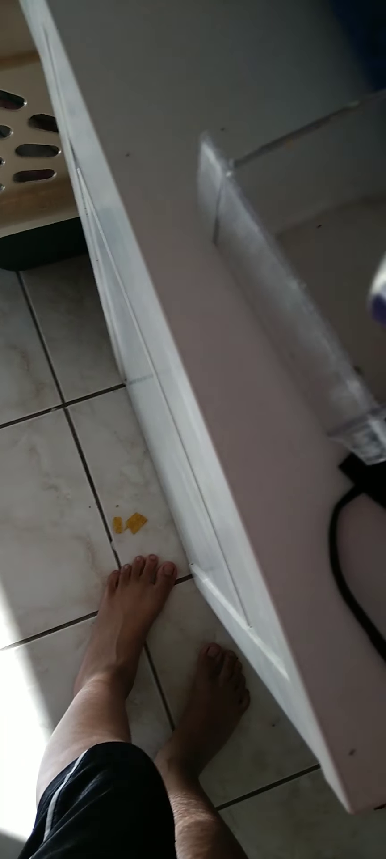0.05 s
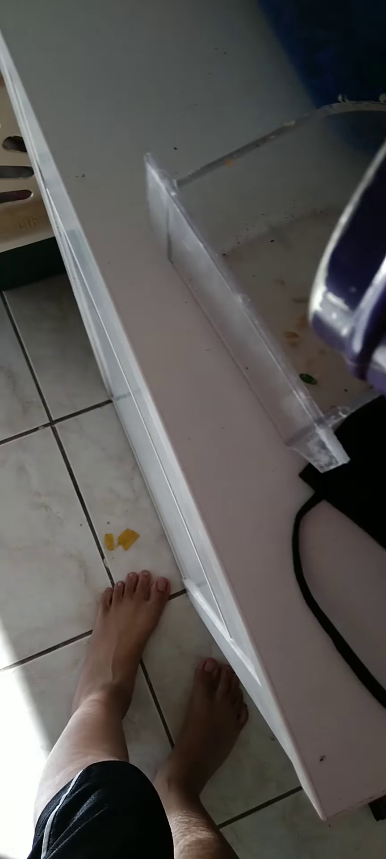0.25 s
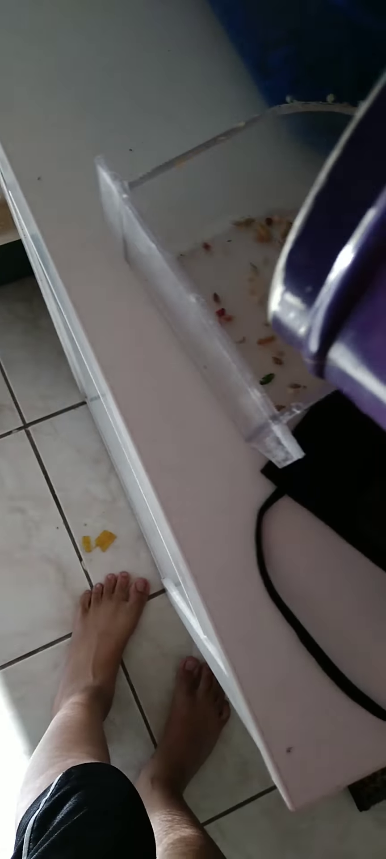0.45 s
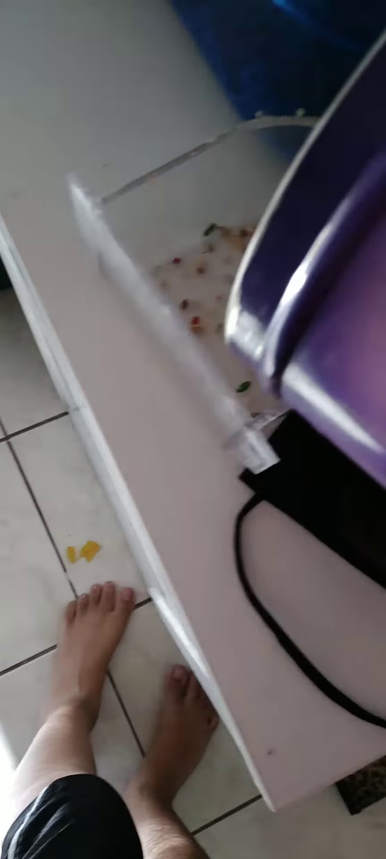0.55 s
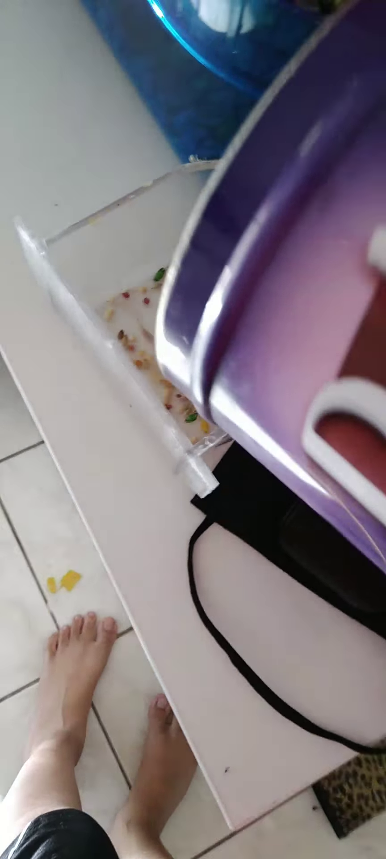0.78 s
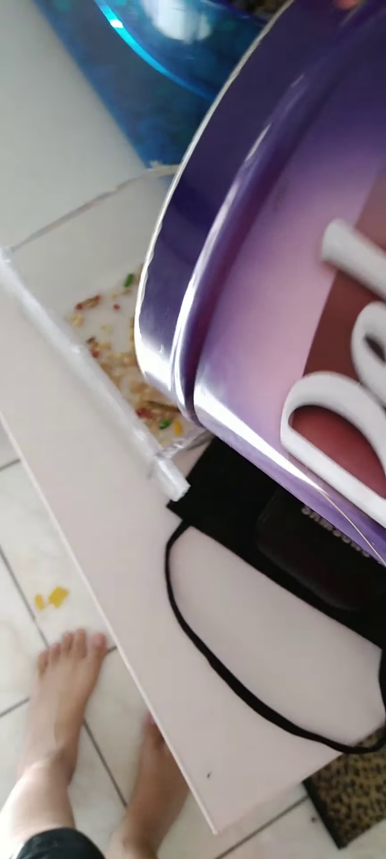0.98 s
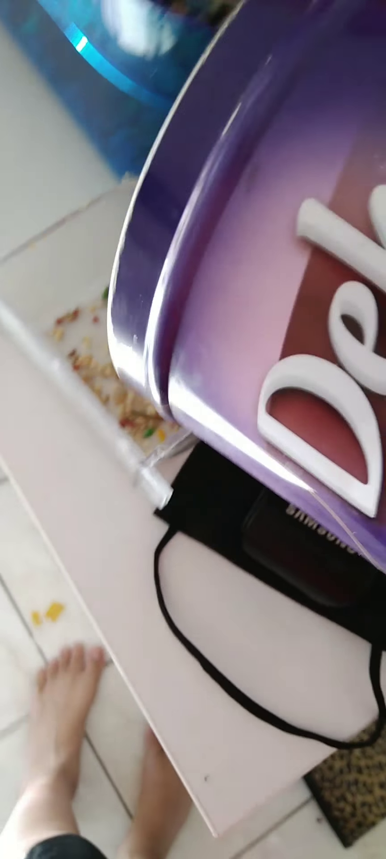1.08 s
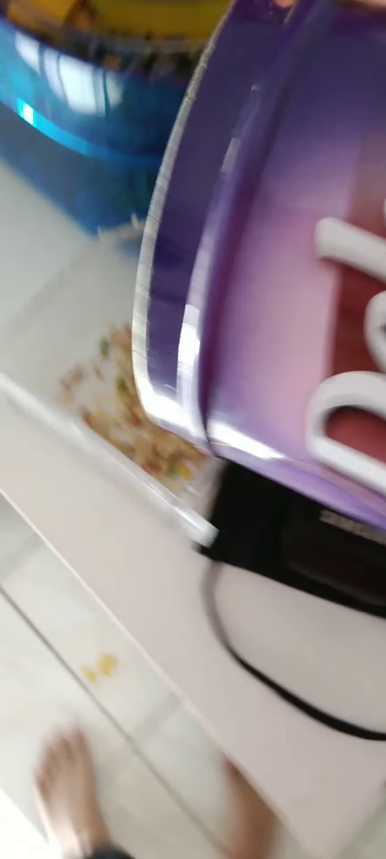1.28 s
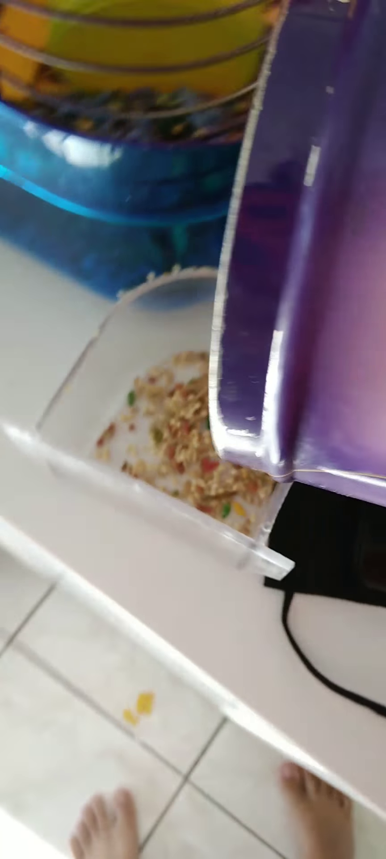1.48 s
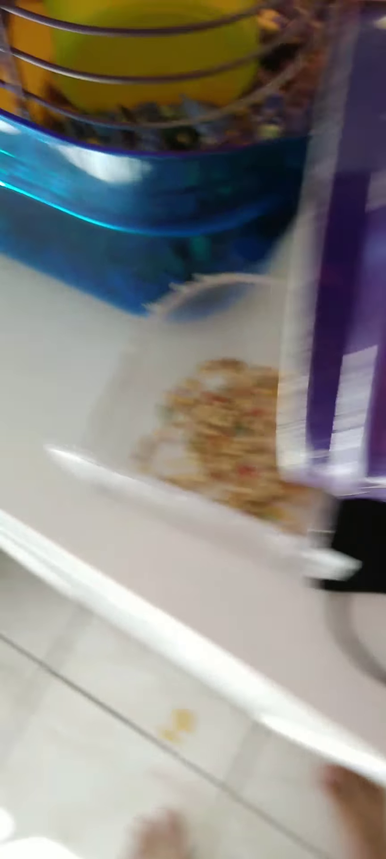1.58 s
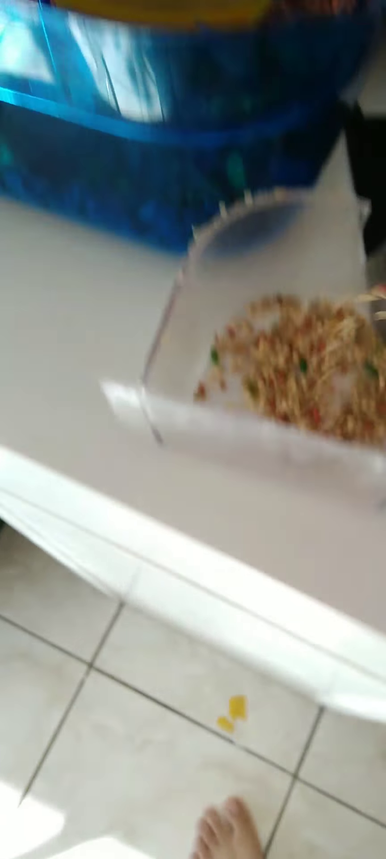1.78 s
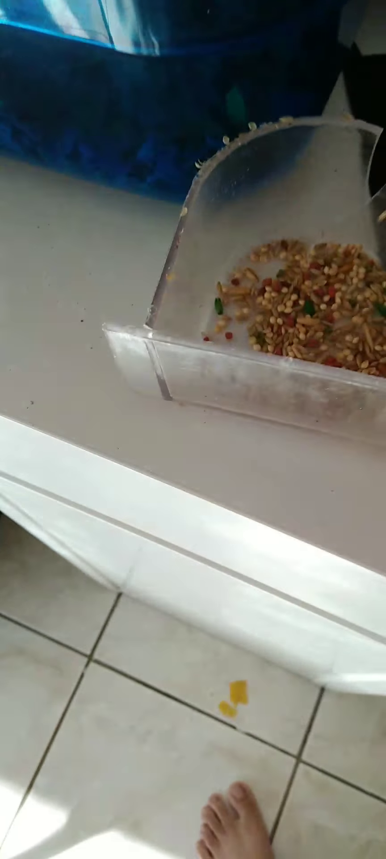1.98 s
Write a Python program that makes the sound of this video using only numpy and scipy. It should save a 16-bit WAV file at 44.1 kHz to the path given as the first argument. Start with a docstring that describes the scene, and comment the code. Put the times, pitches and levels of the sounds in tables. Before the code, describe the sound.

Dry bird seed patters from a tin into a hard plastic tray, close by in a small tiled room. The tray takes a few hollow knocks midway, then the pour stops and leftover seed slides back inside the tin.

```python
"""Dry bird seed slides out of a tin and patters into a hard plastic tray, close to a phone in a small
tiled room, over a low rumble and a hand shifting on the phone. Big seeds tick above the stream, and
midway the tray is bumped a few times, each bump a knock, a thump and a hollow ring. The pour thins out
and stops, the last seed scraping over the lip; the tin is tipped upright and the seed left in it
slides back."""
import sys
import numpy as np
from scipy import signal
from scipy.fft import rfft, irfft
from scipy.io import wavfile

SR = 44100
rng = np.random.default_rng(int(sys.argv[2]) if len(sys.argv) > 2 else 0)


def generate_wav(sig):
    """Save sig (samples, or channels by samples) to the path in sys.argv[1] as 16-bit PCM at SR."""
    pcm = np.round(np.clip(np.atleast_2d(sig).T, -1, 1) * 32767).astype(np.int16)
    wavfile.write(sys.argv[1], SR, pcm)


N = 90404
TIME = np.arange(N) / SR
SEED_UNLIKE, BUMP_UNLIKE = 1, 0.35  # share of a sound that differs between left and right, 0 to 1


def undb(db):
    """Decibels to gain."""
    return 10 ** (np.asarray(db) / 20)


def curve(rows):
    """An automation line through (seconds, value) rows."""
    return np.interp(TIME, *np.array(rows).T)


def unit(x):
    """Scale to rms 1."""
    return x / np.sqrt(np.mean(x ** 2))


def pan(db):
    """Channel gains for a left-minus-right balance in dB."""
    return undb(np.array([[.5], [-.5]]) * db)


def add(out, start_s, x):
    """Mix a sound in at a time."""
    i = int(start_s * SR)
    out[:, i:i + x.shape[-1]] += x[..., :N - i]


def convolve(x, impulse):
    """Play a sound through an impulse response."""
    return signal.fftconvolve(np.atleast_2d(x), np.atleast_2d(impulse), axes=1)[:, :N]


def gains(points, hz):
    """Read (Hz, dB) points as gains along a log-frequency axis."""
    at_hz, db = np.array(points).T
    return undb(np.interp(np.log(hz + 1), np.log(at_hz), db))


def colour(x, points, size=4096):
    """Minimum-phase EQ through (Hz, relative dB) points; white noise keeps its level."""
    gain = unit(gains(points, np.fft.rfftfreq(size, 1 / SR)))
    cepstrum = irfft(np.log(gain))
    cepstrum[1:size // 2] *= 2
    cepstrum[size // 2 + 1:] = 0
    return convolve(x, irfft(np.exp(rfft(cepstrum))))


def fade(t60):
    """Exponential decay from 1 down to -60 dB."""
    return np.exp(-np.log(1000) * TIME[:int(t60 * SR)] / t60)


def mode(hz, t60):
    """One dying sine of random polarity."""
    decay = fade(t60)
    return decay * np.sin(2 * np.pi * hz * TIME[:len(decay)]) * rng.choice([-1, 1])


def burst(t60, unlike, size=32768):
    """Decaying stereo noise: countless modes dying together."""
    noise = rng.standard_normal((3, size))
    decay = fade(t60)[:size]
    stereo = np.sqrt(1 - unlike) * noise[0] + np.sqrt(unlike) * noise[1:]
    x = stereo[:, :len(decay)] * decay
    return x * np.linalg.norm(decay) / np.linalg.norm(x, axis=1, keepdims=True)


def response(t60, unlike=SEED_UNLIKE):
    """A burst of unit energy per side, for use as a resonance or reverb."""
    x = burst(t60, unlike)
    return x / np.linalg.norm(x[0])


# Fader rides for the room rumble and the hand. Each row: time in seconds, level in dB.
RUMBLE_FADER = [(0, -51.5), (.75, -50), (.95, -57.5), (1.5, -57.5), (2.05, -56.5)]
HAND_FADER = [(.28, -80), (.33, -45), (.45, -47.5), (.55, -49), (.66, -43.5), (.85, -71), (1, -74.5)]
# Their tone. Each row: frequency in Hz, relative level in dB.
RUMBLE_EQ = [(12, 3.5), (28, 7.5), (60, -7), (100, -11.5), (200, -18.5), (380, -16), (600, -30),
             (1500, -42.5), (5000, -67.5), (16000, -63)]
HAND_EQ = [(10, -20.5), (27, 2.5), (45, -23), (65, -22), (120, -29), (400, -45.5)]


def rumble():
    """The bed: low room noise and the hand shifting on the phone, nearly mono."""
    out = 0
    for fader, eq in ((RUMBLE_FADER, RUMBLE_EQ), (HAND_FADER, HAND_EQ)):
        noise = rng.standard_normal(N) + .5 * rng.standard_normal((2, N))
        out = out + unit(colour(noise, eq)) * undb(curve(fader))
    return out


def room(x, wet_db, t60, unlike, predelay_s=.008):
    """Add the wash that comes back off the tiles."""
    tail = np.pad(response(t60, unlike), ((0, 0), (int(predelay_s * SR), 0)))
    return x + undb(wet_db) * convolve(x, tail)


def twin_modes(hz, t60, detune=0.0183, twin_db=-8):
    """A mode and its weaker twin, which beats against it differently at each blow and on each side."""
    twins = np.array([mode(hz * (1 + detune * rng.uniform(-0.97, 1)), t60) for _ in range(2)])
    return mode(hz, t60) + undb(twin_db) * twins


# Bumps of the tray. Each row: start in seconds, ring, knock and thump levels in dB,
# centre of the ring in Hz, pitch of the knock in Hz.
BUMP_CUES = [(.573, -37, -26, -54.5, 580, 1990), (.61, -43, -34.5, -71, 505, 1110),
             (.683, -39.5, -61, -55, 308, 349), (0.7252, -39.5, -19, -35.5, 1230, 1430),
             (0.7623, -27, -18, -43.5, 440, 516), (.913, -49.5, -43.5, -73, 443, 437)]
# The tray's hollow ring. Each row: pitch in Hz, relative level in dB, time to fall 60 dB in seconds.
HOLLOW_MODES = [(158.6, -9.5, 0.81), (225.6, -11.5, 0.42), (276.5, -7.5, 0.39), (317.3, -1.5, 0.3),
                (383.4, -2, 0.38), (458.6, 1.5, 0.27), (470.3, -4.5, 0.64), (541.8, 4.5, 0.2),
                (568, -7.5, 0.28), (619, -13, 0.31), (780, -4, 0.38), (846, -1.5, 0.34), (1009, 5, 0.73),
                (1053, 10, 0.31), (1119, 10.5, 0.33), (1383, 1, .25), (1656, 1.5, 0.55)]
# Tone of the knock and of the thump. Each row: frequency in Hz, relative level in dB.
KNOCK_EQ = [(100, -19), (300, -3), (520, 5), (700, -6), (1120, 1.5), (1600, -14), (2100, -18.5),
            (3200, -12.5), (6000, -44)]
THUMP_EQ = [(30, 2), (130, 2.5), (250, 6), (600, -20), (2000, -109)]


def bumps(rolloff_db_per_octave=11.5):
    """A hard knock, a thump through the counter and a hollow ring; where a bump lands sets the pitch."""
    ring, knock, thump = np.zeros((3, 2, N))
    for start, ring_db, knock_db, thump_db, centre_hz, knock_hz in BUMP_CUES:
        for hz, db, t60 in HOLLOW_MODES:
            rolloff_db = rolloff_db_per_octave * abs(np.log2(hz / centre_hz))
            add(ring, start, undb(ring_db + db - rolloff_db) * twin_modes(hz, t60))
        focus = [(knock_hz / 2, -8), (knock_hz, 0), (knock_hz * 2, -4)]
        add(knock, start, undb(knock_db) * colour(burst(t60=0.039, unlike=BUMP_UNLIKE), focus))
        add(thump, start, undb(thump_db) * burst(t60=0.085, unlike=BUMP_UNLIKE))
    blows = colour(knock, KNOCK_EQ) + colour(thump, THUMP_EQ)
    return ring + room(blows, wet_db=-4, t60=0.77, unlike=BUMP_UNLIKE)


# Fader ride for the scrape. Each row: time in seconds, level in dB.
LIP_FADER = [(1.225, -100), (1.238, -42.5), (1.262, -42), (1.276, -60), (1.292, -45), (1.33, -57),
             (1.37, -100)]
# The narrow band it rings. Each row: frequency in Hz, relative level in dB.
LIP_EQ = [(5500, -28), (6900, -5.5), (7400, 4.5), (7900, -10), (9000, -30)]


def lip_scrape():
    """A short, thin scrape as the last seed goes over the lip of the tin."""
    return unit(colour(rng.standard_normal((2, N)), LIP_EQ)) * undb(curve(LIP_FADER))


def spot_eq(spread_db):
    """Random (Hz, dB) points: every landing spot has its own tone."""
    return np.column_stack([np.geomspace(2000, 16000, num=12), spread_db * rng.standard_normal(12)])


def pings(flow, per_s=800, low_hz=2933, high_hz=15930, trim_db=-6, max_pings=2048):
    """Sparkle: hard little seeds, each ringing at its own pitch and place in the stereo field."""
    out = np.zeros((2, N))
    decay = fade(t60=0.014)
    for when, pitch, strength, side, lag in rng.random((max_pings, 5))[:int(per_s * N / SR)]:
        hz = low_hz + pitch * (high_hz - low_hz)
        phases = np.array([[0], [np.pi * (2 * lag - 1)]])
        note = decay * np.sin(2 * np.pi * hz * TIME[:len(decay)] + phases)
        add(out, when * N / SR, strength * np.sqrt([[side], [1 - side]]) * note)
    return unit(out) * undb(curve(flow) + trim_db)


# Where the stream lands. Each row: time in seconds, left minus right in dB.
STREAM_PAN = [(0, -5), (.4, -1.5), (.75, -3), (1.18, -2), (1.25, -7.5), (1.32, -3.5), (1.4, -0.5),
              (1.85, -4)]
SEEDS_PER_S, SEED_SPREAD_DB, PATTER_DB = 1100, 2.5, -0.5
CLUMPS_PER_S, CLUMP_DB = 70, 1.3


def stream(flow, spots=8):
    """Small seeds of uneven size land in little surges on several spots, each with a brief ring."""
    patter = 0
    for _ in range(spots):
        lands = rng.random(N) < SEEDS_PER_S / spots / SR
        sizes = undb(SEED_SPREAD_DB * np.clip(rng.standard_normal(N), -1.6, 1.6))
        impacts = unit(lands * sizes) * undb(curve(flow))
        spot_ring = colour(response(t60=0.012), spot_eq(spread_db=5))
        patter = patter + convolve(impacts, spot_ring)
    clumps = undb(CLUMP_DB * np.interp(TIME * CLUMPS_PER_S, np.arange(N), rng.standard_normal(N)))
    grains = undb(PATTER_DB) * patter / np.sqrt(spots) + pings(flow)
    return grains * clumps * pan(curve(STREAM_PAN))


def ticks(cues, rise_s):
    """Big seeds strike one at a time, each a sharp click with its own brightness."""
    out = np.zeros((2, N))
    for start, db, pan_db, treble_db in cues:
        click = burst(t60=0.028, unlike=SEED_UNLIKE, size=4096)
        attack = 1 - np.exp(-TIME[:click.shape[1]] / rise_s)
        tilt = [(1200, -8.5), (3000, 0.0057), (9000, treble_db / 2), (14000, treble_db)]
        click = colour(click * attack, tilt)
        add(out, start, undb(db) * pan(pan_db) * colour(click, spot_eq(spread_db=3)))
    return out


def vessel(flow, tick_cues, eq, modes, rise_s):
    """Small and big seeds strike a thin wall, which rings on briefly and sings a few high notes."""
    small, big = stream(flow), ticks(tick_cues, rise_s)
    ring = convolve(undb(-3) * small + undb(-10) * big, response(t60=0.1))
    wall = colour(small + big + ring, eq)
    notes = np.zeros((2, N))
    for hz, db, t60 in modes:
        note = mode(hz, t60)
        add(notes, 0, undb(db) * note / np.linalg.norm(note))
    return wall + convolve(wall, notes)


# Seed sliding inside the tin. Each row: time in seconds, level in dB.
TIN_FLOW = [(1.22, -101), (1.248, -44.5), (1.275, -53), (1.31, -57.5), (1.35, -57.5), (1.5, -65),
            (1.53, -94), (1.678, -106.5), (1.684, -47.5), (1.702, -59.5), (1.714, -46), (1.735, -59.5),
            (1.8, -51.5), (1.855, -44), (1.9, -52), (1.96, -59.5), (2.05, -62)]
# Big seeds on the tin. Each row: start in seconds, level in dB, left minus right in dB, treble in dB.
TIN_TICK_CUES = [(1.236, -30, 10, 23), (1.242, -28, 3, 14), (1.2611, -25.5, 3, 17), (1.283, -32, 18, 16),
                 (1.295, -30.5, 5, 10), (1.32, -28, 9, 16), (1.39, -29, -4, 12.5), (1.4284, -29, 0, 7),
                 (1.682, -40.5, 0, 5.5), (1.7465, -30.5, -3, 3.5), (1.774, -25, -5, 7),
                 (1.831, -25.5, -7, 5.5), (1.9142, -34.5, -3, -7), (1.967, -43, -3, 4),
                 (1.992, -31.5, -0.5, 7.5)]
# Tone of the tin. Each row: frequency in Hz, relative level in dB.
TIN_EQ = [(200, -3), (850, -22), (1050, -5), (1300, -5), (1650, -6), (2400, -2), (2850, 5), (3300, -0.5),
          (5000, 2.5), (6100, 4.5), (6900, 0), (7450, 5), (8600, 2), (9600, 0), (11500, -12.5),
          (15700, -23.5)]
# Its thin high notes. Each row: pitch in Hz, level in dB, time to fall 60 dB in seconds.
TIN_NOTES = [(2870, -21, 0.022), (9650, -21.5, 0.013)]


def slide_in_tin():
    """Seed slides back down the tin; glancing hits soften the attack of the ticks."""
    return vessel(TIN_FLOW, TIN_TICK_CUES, TIN_EQ, TIN_NOTES, rise_s=0.00064)


# Seed falling into the tray. Each row: time in seconds, level in dB.
TRAY_FLOW = [(0, -48.5), (.045, -57), (.065, -59), (.11, -51.5), (.202, -51.5), (.21, -40), (.25, -42),
             (.33, -38.5), (.41, -40.5), (.45, -48.5), (.495, -38.5), (.54, -43.5), (.625, -48), (.64, -34),
             (.69, -40), (.81, -36.5), (.86, -40), (.95, -39), (1.07, -49.5), (1.225, -51.5), (1.25, -52.5),
             (1.34, -60.5), (1.42, -66.5), (1.51, -67), (1.535, -95), (1.58, -67), (1.63, -105)]
# Big seeds on the tray. Each row: start in seconds, level in dB, left minus right in dB, treble in dB.
TRAY_TICK_CUES = [(0.2165, -21, 4, 11), (0.2212, -17.5, 1, 12.5), (0.2613, -20, -3, 11.5),
                  (0.3046, -27, -7, 21), (0.327, -23, 2.5, 6.5), (0.406, -26, -7, 23.5),
                  (0.4413, -33, -3, 4), (0.4623, -14, 1, 6.5), (0.5119, -26.5, -2.5, 14),
                  (.632, -21.5, -3.5, 19), (0.6546, -23, 0.5, 4), (0.7263, -30.5, -11.5, -4),
                  (0.7523, -28.5, -9, 10), (0.768, -17.5, -4, 13), (0.805, -25.5, 1.5, 4.5),
                  (0.8747, -23.5, -4.5, 11.5), (0.9284, -21, -0.5, 9.5), (1.0454, -38, 6, 7.5),
                  (1.095, -41, 9, 5), (1.1072, -30, 1.5, 3.5), (1.1787, -28, -4, 13.5)]
# Tone of seed on plastic. Each row: frequency in Hz, relative level in dB.
TRAY_EQ = [(200, -29.5), (900, -22), (1060, -4), (1180, -3.5), (1420, -5.5), (1650, -11), (2050, 0.5),
           (2350, -4.5), (2800, -1.5), (4000, -5), (5600, 2), (7000, -2), (7900, 1.5), (9000, -2),
           (10200, -5.5), (11200, -14), (12800, -19), (15700, -21.5)]
# The tray wall's thin high notes. Each row: pitch in Hz, level in dB, time to fall 60 dB in seconds.
TRAY_NOTES = [(2050, -22.5, 0.099), (2425, -23, 0.13), (3333, -27, 0.044), (4782, -23.5, 0.18),
              (5490, -26, 0.023), (6232, -23.5, 0.04)]


def pour_into_tray():
    """The lead: seed hits the hard plastic head on, so the ticks are crisp."""
    return vessel(TRAY_FLOW, TRAY_TICK_CUES, TRAY_EQ, TRAY_NOTES, rise_s=0.00039)


# Tone of each side. Each row: frequency in Hz, gain in dB.
LEFT_EQ = [(100, -1.5), (400, 0.5), (1300, 2), (1900, 5), (3000, 3.5), (5500, 1), (7200, 5), (8100, 0),
           (8800, -2), (10000, -15), (11500, -5.5), (14000, 0)]
RIGHT_EQ = [(100, 2), (400, -1), (1300, -1), (1900, -3.5), (3000, 1.5), (5500, -2), (7200, -6), (8100, -7),
            (8800, -3.5), (10000, 8), (11500, 3.5), (14000, 0.5)]
# Stereo width. Each row: frequency in Hz, side relative to mid in dB.
STEREO_WIDTH = [(1200, -0.5), (4500, 0.5), (7500, -3), (10000, -3.5), (13000, -2.5)]


def stereo_image(x, right_lag_s=0.000419):
    """The left side leads slightly; the treble sits nearer the centre, and each side has its own tone."""
    hz = np.fft.rfftfreq(N, 1 / SR)
    left = rfft(x[0])
    right = rfft(x[1]) * np.exp(-2j * np.pi * hz * right_lag_s)
    width = gains(STEREO_WIDTH, hz)
    mid, side = np.array([left + right, (left - right) * width]) / np.sqrt(2 + 2 * width ** 2)
    return irfft(np.array([(mid + side) * gains(LEFT_EQ, hz), (mid - side) * gains(RIGHT_EQ, hz)]), N)


def scene():
    """The mix: nearly dry seed and roomier bumps placed in stereo, over the rumble."""
    seeds = pour_into_tray() + slide_in_tin() + lip_scrape()
    seeds = room(seeds, wet_db=-19, t60=0.046, unlike=SEED_UNLIKE)
    return stereo_image(seeds + bumps()) + rumble()


def record(dry, top_hz=16000):
    """The phone cuts the top with a steep low-pass."""
    return signal.sosfilt(signal.ellip(8, .2, 70, top_hz, fs=SR, output="sos"), dry)


dry = scene()
out = record(dry)
generate_wav(out)
```